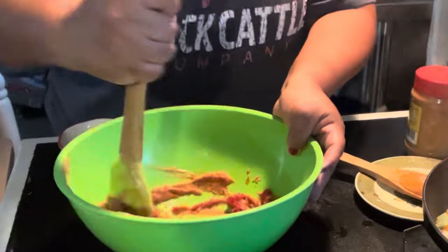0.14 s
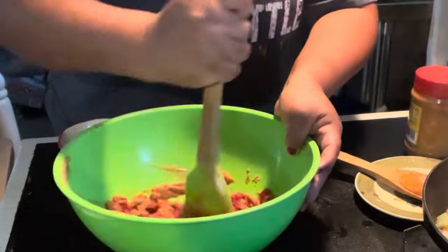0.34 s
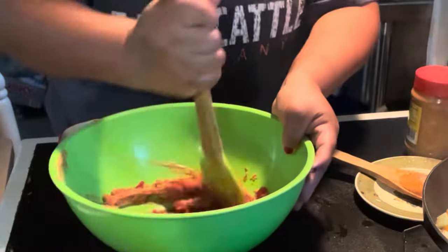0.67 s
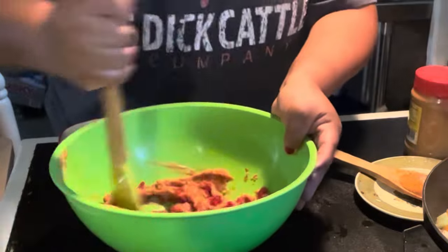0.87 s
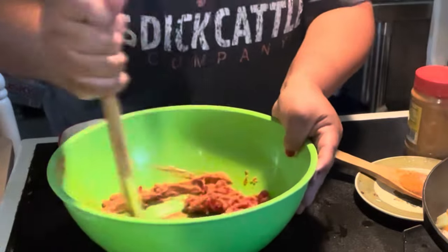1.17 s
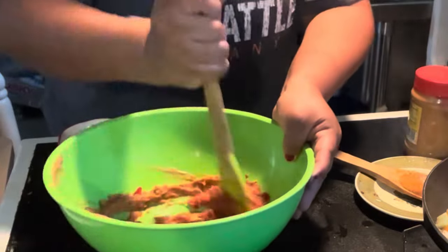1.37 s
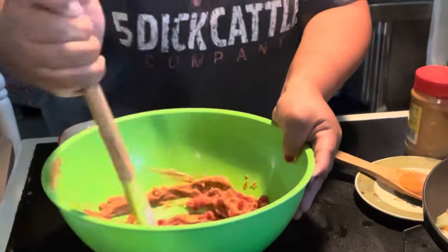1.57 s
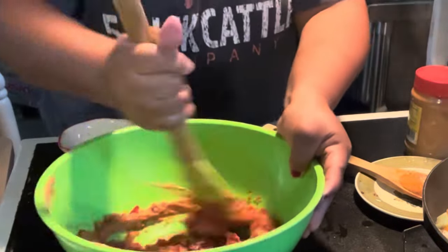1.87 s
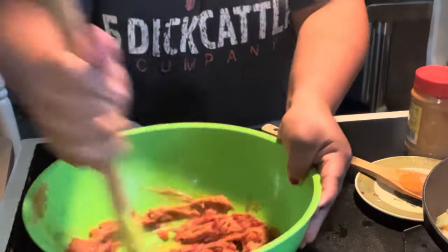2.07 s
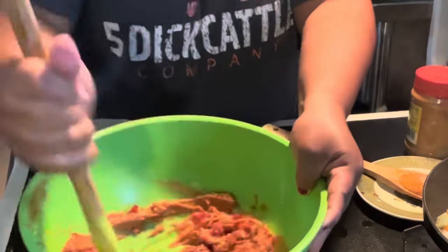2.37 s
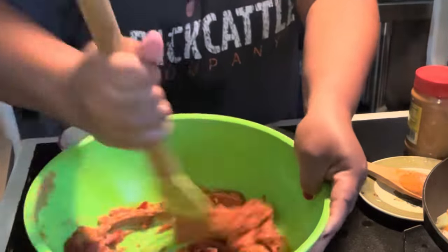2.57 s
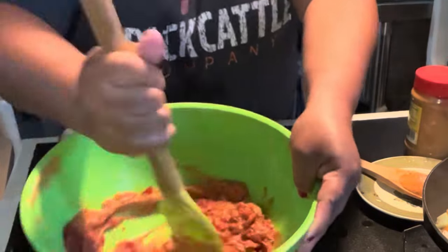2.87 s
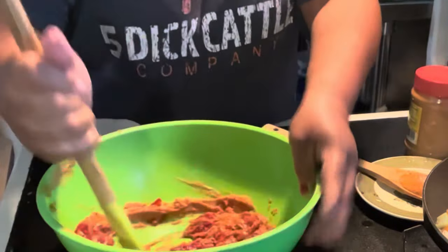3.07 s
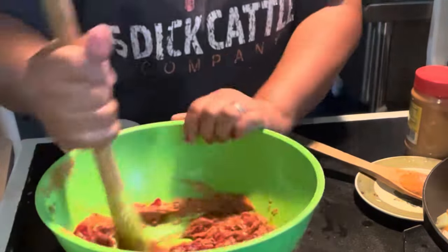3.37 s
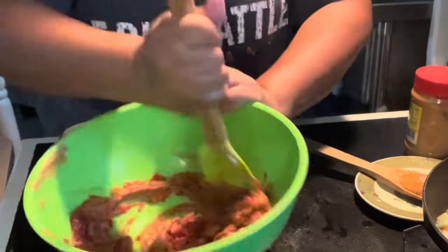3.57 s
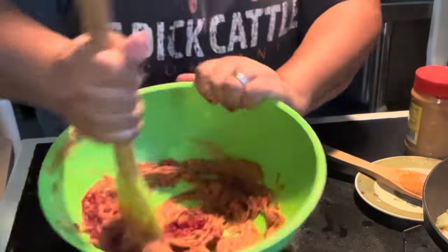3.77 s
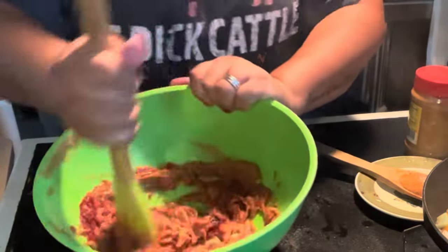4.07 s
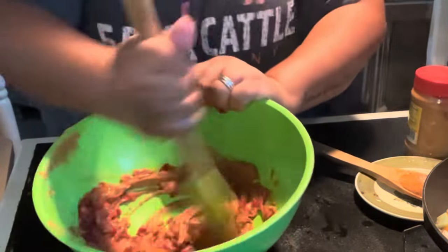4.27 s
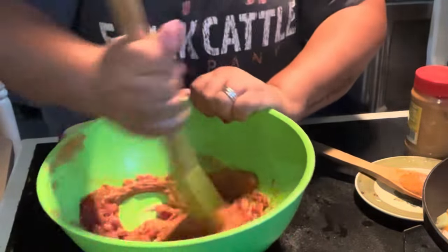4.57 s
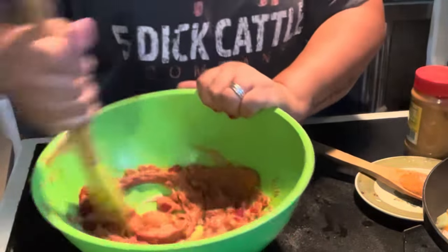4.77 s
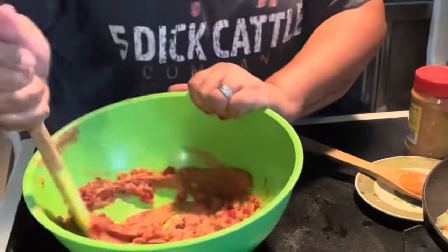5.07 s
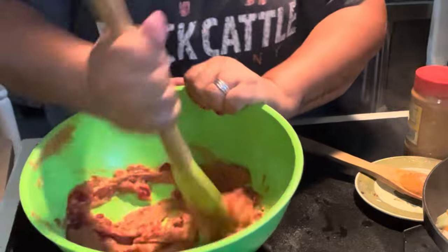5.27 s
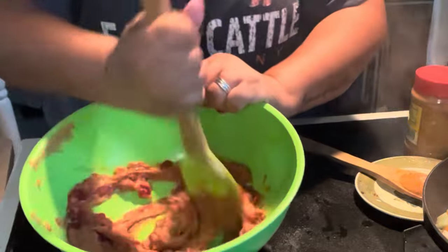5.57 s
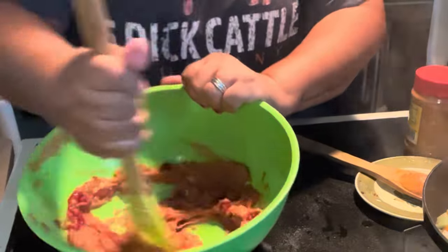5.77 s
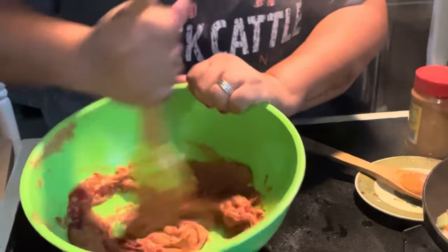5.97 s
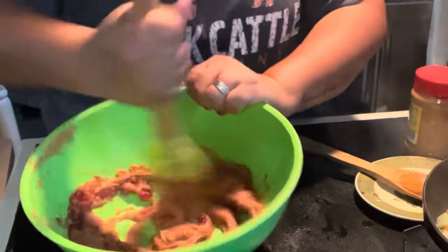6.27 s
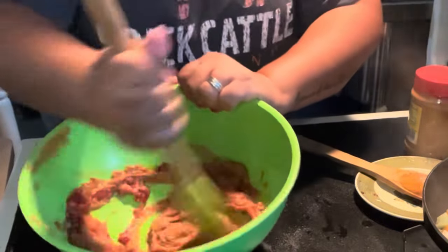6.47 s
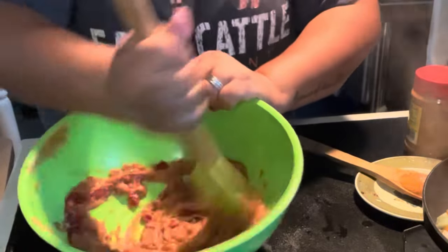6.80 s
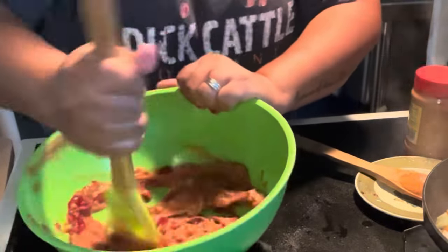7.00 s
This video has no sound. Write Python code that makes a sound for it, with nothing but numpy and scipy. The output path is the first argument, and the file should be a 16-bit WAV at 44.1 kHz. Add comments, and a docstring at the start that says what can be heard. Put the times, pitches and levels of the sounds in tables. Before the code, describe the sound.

Close up in a kitchen with little echo, a pan sizzles softly over a faint hum while someone stirs sticky paste in a plastic bowl. The wooden spoon taps and scrapes the sides, the paste crackles quietly, and the rocking base bumps the counter. One loud hollow thump comes early, and a louder one follows near the middle between two short rumbling drags. Uneven knocking and scraping continue to the end.

```python
"""From the start a steady hiss, probably a pan frying, and a faint mains hum lie behind a wooden spoon
working sticky paste round a plastic bowl. Impacts excite the bowl's modes as knocks, ticks and thuds;
friction makes it rumble and scrape, and tearing paste crackles. At 0.8 s the bowl drops on its base.
At 2.8 s it drags across the kitchen counter, drops again, harder, and at 3.4 s drags once more.
The stirring then goes on to the end, with its strongest knocks near 4.5 s and 6.1 s."""
import sys
import numpy as np
from scipy import signal
from scipy.fft import rfft, irfft
from scipy.io import wavfile
from scipy.ndimage import uniform_filter1d

SR = 44100
rng = np.random.default_rng(int(sys.argv[2]) if len(sys.argv) > 2 else 0)


def put_to_file(sound):
    """Save the sound as 16-bit audio at rate SR, in the file named by the first command-line argument."""
    columns = np.atleast_2d(sound).T  # one column per channel
    safe = np.clip(columns, -1, 1)
    whole_steps = np.round(safe * 32767)
    wavfile.write(sys.argv[1], SR, whole_steps.astype(np.int16))


N = 314874


def gain_of(db):
    """Amplitude ratio of a level in decibels."""
    return 10 ** (np.asarray(db) / 20)


def unit_rms(x):
    """Normalisation to unit mean power."""
    return x / np.sqrt(np.mean(x ** 2) + 1e-20)


def peaked(x, db):
    """Normalisation to a peak level."""
    return gain_of(db) * x / abs(x).max()


def curve_at(points, hz):
    """Interpolation on a logarithmic frequency axis."""
    f, value = np.transpose(points)
    return np.interp(np.log(hz + 1), np.log(f + 1), value)


def band(centre_hz, octaves):
    """Band-limited excitation: a spectrum in dB, 12 dB down at `octaves` either side of the centre."""
    return lambda hz: -12 * (np.log2(hz / centre_hz) / octaves) ** 2


def add(mix, start, sound):
    """Superposition of a sound from `start` seconds on."""
    part = mix[round(start * SR):][:len(sound)]
    part += sound[:len(part)]


def impulses(per_s, spread_db, cap):
    """Poisson process: impulses of random sign and exponential level, at most cap * spread_db."""
    sizes = gain_of(spread_db * np.minimum(rng.exponential(1, N), cap))
    return sizes * (rng.random(N) < per_s / SR) * rng.choice([-1, 1], N)


def noise(spectrum, patchy_db, size):
    """Spectral shaping of Gaussian noise, with patches of level drifting in time and frequency."""
    frames, hz = 4 * N // size + 5, np.fft.rfftfreq(size, 1 / SR)
    real, imag, patches = rng.standard_normal((frames, len(hz), 3)).T
    patches = unit_rms(uniform_filter1d(uniform_filter1d(patches, size=12, axis=0), size=12, axis=1))
    spectra = (real + 1j * imag) * gain_of(curve_at(spectrum, hz)[:, None] + patchy_db * patches)
    return unit_rms(signal.istft(spectra, nperseg=size, noverlap=3 * size // 4)[1][:N])


# Spectral density of the room noise: f/Hz, relative level/dB
ROOM_SPECTRUM = [(15, -65), (25, 6), (102, -6), (168, -3), (241, -18), (292, -11), (407, -15), (472, -14.5),
                 (730, -33), (900, -13), (1170, -54), (1980, -120)]
def room_tone(noise_db=-60.5, hum_hz=119, hum_db=-69):
    """Random amplitude modulation makes a mains hum waver over low-frequency room noise."""
    waver = unit_rms(uniform_filter1d(rng.standard_normal(N), size=6000))
    hum = np.sin(2 * np.pi * hum_hz * np.arange(N) / SR) * gain_of(hum_db + 2.7 * waver)
    return gain_of(noise_db) * noise(ROOM_SPECTRUM, patchy_db=2.0, size=4096) + hum


# Spectral density of the frying hiss: f/Hz, relative level/dB
HISS_SPECTRUM = [(410, -51), (700, -12), (994, 1.5), (1240, -0.5), (6000, 0.5), (15600, -6.5)]
def sizzle(hiss_db=-49):
    """Shot noise: small separate spits stand on a continuous hiss of the same spectrum."""
    spits = impulses(per_s=150, spread_db=2.8, cap=3.2)
    spits = irfft(rfft(spits) * gain_of(curve_at(HISS_SPECTRUM, np.fft.rfftfreq(N, 1 / SR))), N)
    hiss = noise(HISS_SPECTRUM, patchy_db=1.4, size=512)
    return gain_of(hiss_db) * (hiss + gain_of(-9) * unit_rms(spits))


# Reverberation time of the kitchen: f/Hz, T60/s
KITCHEN_DECAY = [(100, 0.14), (300, 0.27), (1000, 0.19), (3000, 0.15), (8000, 0.2)]
def kitchen(x):
    """Reverberation: sparse reflections of random sign decay exponentially, each band at its own rate."""
    taps = np.zeros(SR // 2)
    slots = np.arange(180, SR // 2 - 20, 20)
    taps[slots + rng.integers(0, 20, len(slots))] = rng.choice([-1., 1.], len(slots))
    hz, t, spectra = signal.stft(taps, SR, nperseg=256)
    decay = gain_of(-60 * t / curve_at(KITCHEN_DECAY, hz)[:, None])
    tail = signal.istft(spectra * decay, SR, nperseg=256)[1]
    return signal.fftconvolve(x, tail / np.linalg.norm(tail))[:N]


def crack(contact, drive, lag_cycles=1.7):
    """Dispersion: each tone takes some cycles to build up, so the first wave is a falling chirp."""
    hz = np.fft.rfftfreq(4096, 1 / SR) + 1
    dispersion = np.exp(-2j * np.pi * (lag_cycles * np.log(hz) + hz * 40 / SR))
    return irfft(rfft(contact, 4096) * gain_of(drive(hz)) * dispersion)[:2000]


# Normal modes of the bowl on the counter: f/Hz, relative level/dB, T60/s
BOWL_MODES = [(62, -27, .3), (86, -19, .35), (126, -15, .18), (182, 0, .1), (246, -1, .1), (341, -8, .1),
              (470, -12, .08), (590, -11, .1), (680, -13, .06), (780, -15, .06), (985, -12, .05),
              (1200, -15, .04), (1355, -15, .04), (1510, -15, .035), (1640, -16, .035), (2000, -22, .015),
              (2400, -17, .025), (2700, -18, .02), (3200, -21, .015), (4300, -20, .015), (4950, -17, .02),
              (5600, -20, .015)]
def ring(drive, seconds=0.44, lag_cycles=0.2125):
    """Modal superposition: the impulse response is a sum of damped sines, the low ones starting later."""
    hz, db, t60 = np.transpose(BOWL_MODES)[:, :, None]
    t = np.maximum(np.arange(round(seconds * SR)) / SR - lag_cycles / hz, 0)
    envelope = gain_of(db + drive(hz) - 60 * t / t60) * (1 - np.exp(-t * hz * 2))
    polarity = (-1) ** np.arange(len(BOWL_MODES))[:, None]  # neighbouring modes swing opposite ways
    return (polarity * envelope * np.sin(2 * np.pi * hz * t)).sum(0)


def settled(sound, after_s, choke_db=-4.5, span_s=0.0045):
    """Contact damping: the ringing steps down once the base sits flat again."""
    t = np.arange(len(sound)) / SR
    return sound * gain_of(choke_db / (1 + np.exp(np.clip((after_s - t) / span_s, -50, 50))))


# Paste tearing off the spoon: onset t/s, duration/s, level/dB
SQUELCH_BURSTS = [(0.424, .1, -51), (1.233, .06, -53), (2.393, .05, -52.5), (4.02, 0.086, -52),
                  (4.182, .04, -62), (6.245, 0.044, -57), (6.43, .04, -62)]
def squelches():
    """Rupture: tearing paste radiates bursts of tiny pops of uneven size."""
    t = np.arange(N) / SR
    pops = impulses(per_s=490, spread_db=4, cap=4)
    crackle = signal.oaconvolve(pops, crack(np.ones(1), band(1850, 1.4)))[:N]
    bursts = sum(gain_of(db) * np.sin(np.pi * np.clip((t - start) / length, 0, 1))
                 for start, length, db in SQUELCH_BURSTS)
    return bursts * unit_rms(crackle)


# The spoon shoves through the paste and drags the bowl: peak t/s, build-up/s, force level/dB
SPOON_SHOVES = [(0.32, .08, -60), (1.43, .08, -84), (1.625, 0.1, -49.5), (1.75, .05, -60), (1.9, 0.04, -51),
                (2.03, 0.14, -49), (2.45, 0.066, -51.5), (2.818, 0.074, -30), (3.442, 0.062, -30),
                (3.695, 0.056, -43), (4.08, 0.066, -55), (4.71, 0.046, -57), (5.97, 0.069, -60),
                (6.3, .05, -59)]
def force_db(t, climb_db=29, release_db_per_s=446):
    """Loading and release: the force level climbs along a parabola, then falls quickly."""
    peak_s, build_s, db = np.transpose(SPOON_SHOVES)[:, :, None]
    below_peak = np.where(t < peak_s, climb_db * ((peak_s - t) / build_s) ** 2,
                          release_db_per_s * (t - peak_s))
    return (db - below_peak).max(0)


# Ceaseless stirring under the shoves: t/s, rumble level/dB, scrape level/dB
STIRRING_LEVELS = [(0.0, -61, -68), (0.2, -67, -71), (0.97, -62.5, -66), (1.27, -71, -69), (2.76, -68, -70),
                   (2.92, -61, -63), (3.06, -65, -79), (3.34, -63.5, -71), (3.58, -55, -61.5),
                   (3.82, -66, -74.5), (4.38, -72, -72.5), (4.87, -63, -69), (5.49, -68, -75.5),
                   (7.14, -66, -73)]
def drag(sway_db=4.5, chatter_db_per_s=245):
    """Stick-slip friction: an uneven force shakes the low modes; gritty slips scrape the middle ones."""
    t = np.arange(N) / SR
    rumble = signal.oaconvolve(rng.standard_normal(N), ring(band(161.6, 0.83)))[:N]
    power = uniform_filter1d(rumble ** 2, size=900) + 0.25 * np.mean(rumble ** 2)
    rumble = rumble / power ** 0.093  # slight levelling keeps the loudness a little steadier
    slips = impulses(per_s=500, spread_db=1.13, cap=5)
    scrape = signal.oaconvolve(slips, ring(band(1000, 1.48), seconds=0.087))[:N]
    times, rumble_db, scrape_db = np.transpose(STIRRING_LEVELS)
    sway = unit_rms(uniform_filter1d(uniform_filter1d(rng.standard_normal(N), size=1500), size=1500))
    stir_rumble = gain_of(np.interp(t, times, rumble_db) + sway_db * sway)
    stir_scrape = gain_of(np.interp(t, times, scrape_db) + sway_db * sway)
    # the base chatters after each drop
    chatter = sum((t > start) * gain_of(db - 27 - chatter_db_per_s * abs(t - start))
                  for start, db, *_ in BOWL_DROPS)
    shove_db = force_db(t)
    shove_scrape = gain_of(0.79 * shove_db - 28.5)  # scraping follows the force only in part
    return (unit_rms(rumble) * (gain_of(shove_db) + stir_rumble)
            + unit_rms(scrape) * (shove_scrape + stir_scrape + chatter))


# The bowl rocks and its base meets the counter: t/s, peak level/dB
BASE_THUDS = [(0.037, -42), (0.453, -49), (0.54, -42.5), (0.697, -49), (1.079, -38), (1.136, -44),
              (1.243, -44), (1.563, -46), (1.852, -43), (1.899, -39), (1.964, -36), (2.018, -33),
              (2.232, -40), (2.349, -48), (2.465, -35), (3.256, -49), (3.426, -25), (3.45, -28),
              (3.608, -44), (3.66, -36), (3.864, -53), (4.111, -46.5), (4.375, -53), (4.434, -49.5),
              (4.549, -35), (4.723, -41.5), (4.765, -46), (4.847, -42), (4.925, -41), (5.11, -44),
              (5.287, -46), (5.453, -43.5), (6.111, -39.5), (6.289, -46), (6.451, -38), (6.615, -34),
              (6.712, -52), (6.767, -45), (6.864, -47.5), (6.921, -41.5)]
def thuds(contact_s=0.0043):
    """Soft impact: a long contact excites the low modes, each time at a slightly different spot."""
    out, push = np.zeros(N), np.hanning(round(contact_s * SR))
    for (start, db), centre_hz in zip(BASE_THUDS, rng.uniform(129.5, 179.45, len(BASE_THUDS))):
        thud = signal.oaconvolve(push, ring(band(centre_hz, 0.71), seconds=.2))
        add(out, start - .004, peaked(settled(thud, after_s=0.02604), db))
    return out


# The spoon on the wall, and the bowl touching down and bouncing around its second drop:
# t/s, snap level/dB, snap f/Hz, knock level/dB, knock f/Hz, tick level/dB, contact time/ms
SHARP_KNOCKS = [(0.1273, -43, 2850, -55, 1050, -37, 6), (0.1608, -48, 1530, -39, 1110, -43, 2.8),
                (0.5407, -30.5, 2270, -44, 890, -41, 2.9), (0.684, -50, 2600, -55, 1050, -39, 1.5),
                (0.6948, -50, 1790, -38.5, 1030, -42, 2.1), (0.9274, -49, 1740, -43.5, 600, -42, 3.2),
                (1.0167, -43, 1650, -56, 1050, -28.5, 0.79), (1.076, -50, 1640, -44, 744, -39, 3.4),
                (1.2366, -44, 2620, -37.5, 1050, -36, 3.5), (1.242, -38, 2800, -38, 1050, -50, 1.3),
                (1.252, -35, 2920, -46, 1030, -40, 2.6), (1.271, -48, 1600, -43.5, 745, -45, 5.1),
                (1.8974, -40, 1800, -47, 1050, -44, 1.4), (2.0497, -41.5, 1540, -43, 1040, -33, 6.2),
                (2.1903, -38.5, 2560, -45, 1050, -29, 1.3), (2.2235, -41, 1480, -43, 606, -53, 1.5),
                (2.2358, -41, 1750, -65, 900, -41, 3.3), (2.4125, -50, 1490, -41.5, 880, -44, 8.5),
                (2.712, -48, 1490, -58, 1050, -36, 4.4), (2.897, -58, 1600, -38, 680, -48, 4.3),
                (2.9502, -43, 1660, -24, 595, -56, 3.2), (2.9687, -48, 1590, -34, 600, -53, 2.8),
                (3.2524, -54, 2690, -62, 1050, -39, 4.4), (3.3763, -43.5, 1740, -64, 600, -35, 3.3),
                (3.421, -56, 2500, -34.5, 600, -52, 0.71), (3.4497, -26, 1700, -43, 600, -35, 0.54),
                (3.536, -35.5, 3250, -41, 1040, -30, 1.3), (4.0284, -44, 2350, -48, 1050, -52, 2.5),
                (4.0513, -43, 1530, -37, 1050, -44, 1.8), (4.1065, -38, 1690, -47, 600, -38, 2.5),
                (4.19, -45, 2600, -63, 1050, -42, 2.2), (4.2095, -48, 1600, -46, 1050, -46, 3.4),
                (4.5436, -25.5, 2760, -26.5, 910, -23.5, 4), (4.7217, -34.5, 2280, -41.5, 1070, -40, 6.5),
                (4.7536, -56, 1630, -36, 1050, -50, 4.9), (4.7656, -35, 1770, -37.5, 750, -36.5, 4.4),
                (4.9219, -35.5, 1450, -31, 700, -36, 1.9), (5.2855, -66, 1530, -39, 940, -52, 3),
                (5.9417, -40, 3130, -50, 950, -40, 1.9), (6.106, -33.5, 2000, -23.5, 1110, -31, 2.54),
                (6.2372, -45, 2500, -50, 950, -59, 2.5), (6.2771, -42, 1810, -36.5, 836, -39, 4.4),
                (6.284, -42, 1600, -50, 1050, -39, 1.7), (6.331, -46, 1620, -63, 1050, -30, 2.9),
                (6.4445, -46, 2820, -38.5, 900, -52, 0.7), (6.4585, -45, 1630, -40, 610, -43, 4.3),
                (6.6072, -41, 1580, -39.5, 580, -42, 6.4), (6.752, -43, 2970, -62, 1050, -50, 1.6),
                (6.7595, -40.5, 2380, -37.5, 1070, -33.5, 5.2), (6.9054, -39, 1640, -30, 1040, -50, 3.3),
                (6.9116, -47, 1530, -38, 1050, -37, 1.4), (6.9169, -39, 1550, -31.5, 920, -33, 2.3),
                (7.0752, -43.5, 1530, -45.5, 603, -43, 3.7)]
def knocks():
    """Hard impact: a short ragged contact gives a snap, a duller knock and a tick, and rings the modes."""
    out, t_ms = np.zeros(N), np.arange(800) / SR * 1000
    grits = rng.standard_normal((len(SHARP_KNOCKS), 800))
    for impact, grit in zip(SHARP_KNOCKS, grits):
        start, snap_db, snap_hz, knock_db, knock_hz, tick_db, contact_ms = impact
        progress = t_ms / contact_ms
        contact = grit * abs(grit) * progress ** 2 * np.exp(-4 * progress)
        bands = ((snap_db, band(snap_hz, 0.24)), (snap_db + 2.5, band(2630, 0.46)),
                 (knock_db, band(knock_hz, 0.96)),
                 (tick_db, band(5000, 0.42)), (tick_db - 9, band(9100, 0.65)))
        for db, drive in bands:
            ringing = signal.oaconvolve(contact, ring(drive, seconds=0.062))
            add(out, start - .0025, peaked(crack(contact, drive), db))
            add(out, start - .0015, peaked(ringing, db - 20))
    return out


# The bowl drops on its base:
# t/s, ring peak level/dB, contact cut-off f/Hz, crack level/dB re ring, crunch peak level/dB
BOWL_DROPS = [(0.808, -12, 506, -4.5, -40.5), (2.907, -6.5, 520, -2, -30.5)]
def drops(bass_cut_hz=59, ring_lag_s=0.00338):
    """Impulse excitation: a broad soft blow rings the bowl; the base rattles, jolted paste crunches."""
    out, t = np.zeros(N), np.arange(2000) / SR
    grits = rng.standard_normal((len(BOWL_DROPS), 2, 2000))
    for (start, db, cut_hz, crack_db, crunch_db), (base_grit, paste_grit) in zip(BOWL_DROPS, grits):
        # the soft contact loses treble, and a quick blow barely moves the deepest modes
        ringing = ring(lambda hz: -17 * np.log10(1 + (hz / cut_hz) ** 2)
                       - 14 * np.log10(1 + (bass_cut_hz / hz) ** 2))
        first_wave = crack(np.ones(1), band(454, 1.72))
        rattle = crack(base_grit * np.exp(-t / 0.0058), band(1820, 0.93))
        crunch = crack(paste_grit * t * np.exp(-t / 0.0092), band(5400, 1.06))
        add(out, start + ring_lag_s, peaked(settled(ringing, after_s=0.031), db))
        add(out, start - .001, peaked(first_wave, db + crack_db))
        add(out, start - .001, peaked(rattle, db + crack_db - 6.5))
        add(out, start - .004, peaked(crunch, crunch_db))
    return out


def scene():
    """Direct and reverberant fields of the bowl and spoon add to the hiss and room tone."""
    bowl = drops() + knocks() + thuds() + drag() + squelches()
    return (bowl + gain_of(-9) * kitchen(bowl) + sizzle() + room_tone())[None]


# Peaks and dips of a small microphone in its housing: f/Hz, level/dB
MIC_RESPONSE = [(900, -0.5), (1240, 2.5), (1570, 1), (2060, -6.5), (2400, -2), (3370, -7.5), (4260, 0.5),
                (5180, 2), (7170, -12), (8170, -5.5), (9300, -11.5), (11000, -7.5), (15600, -13.5)]
def record(dry, low_cut_hz=67.4, band_limit_hz=15780):
    """Linear filtering: the microphone's response, a high-pass, then a steep low-pass."""
    coloured = irfft(rfft(dry) * gain_of(curve_at(MIC_RESPONSE, np.fft.rfftfreq(N, 1 / SR))), N)
    high_pass = signal.butter(4, low_cut_hz, "high", fs=SR, output="sos")
    low_pass = signal.firwin(1023, band_limit_hz, window=("kaiser", 9), fs=SR)
    return signal.oaconvolve(signal.sosfilt(high_pass, coloured), low_pass[None], "same")


dry = scene()
out = record(dry)
put_to_file(out)
```